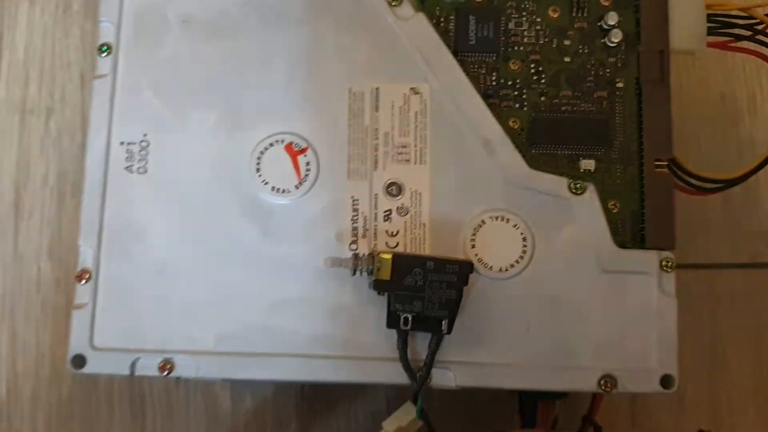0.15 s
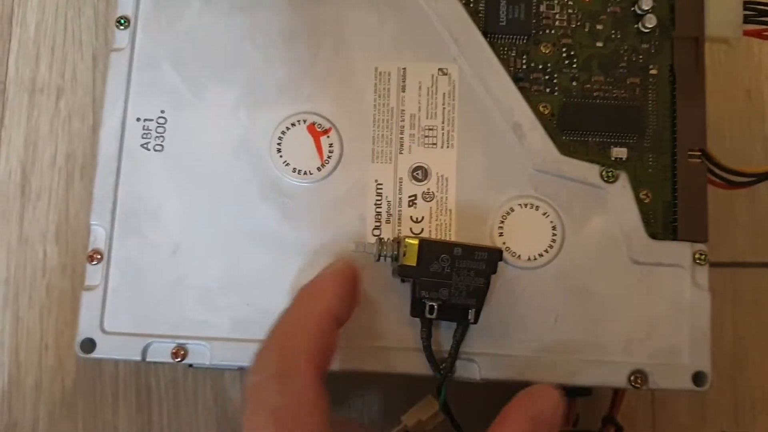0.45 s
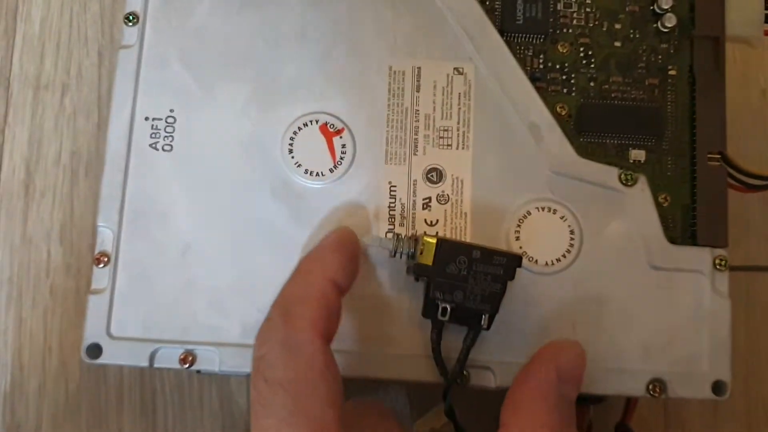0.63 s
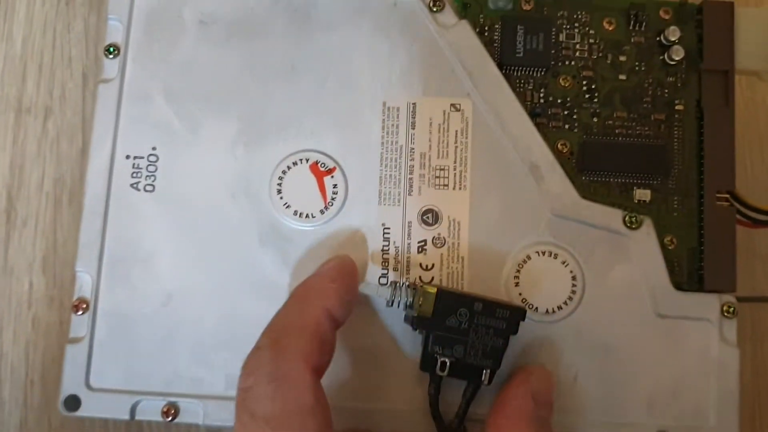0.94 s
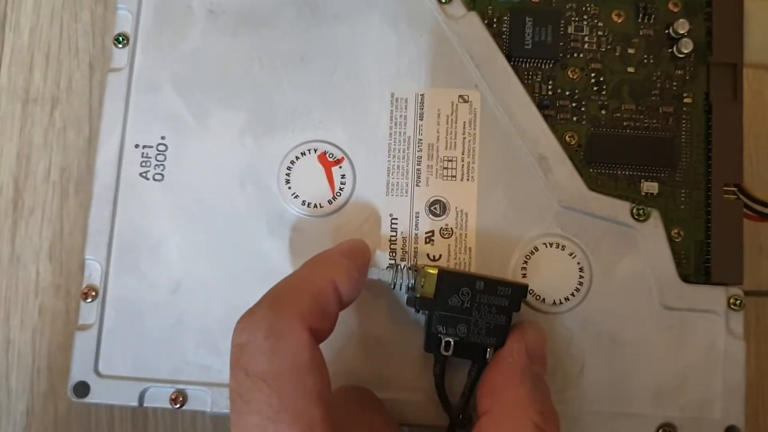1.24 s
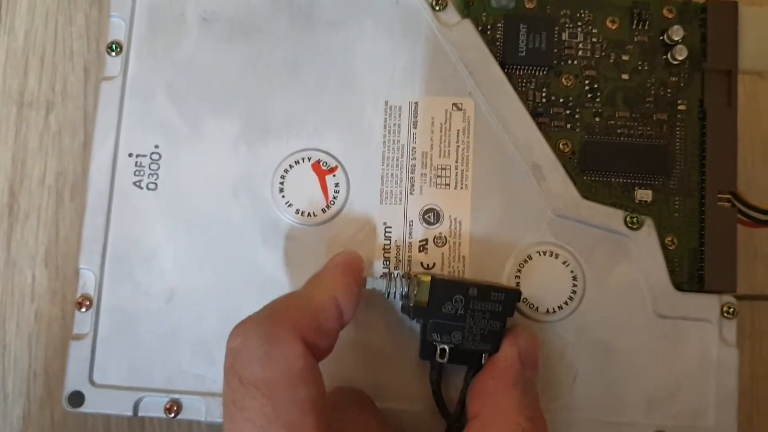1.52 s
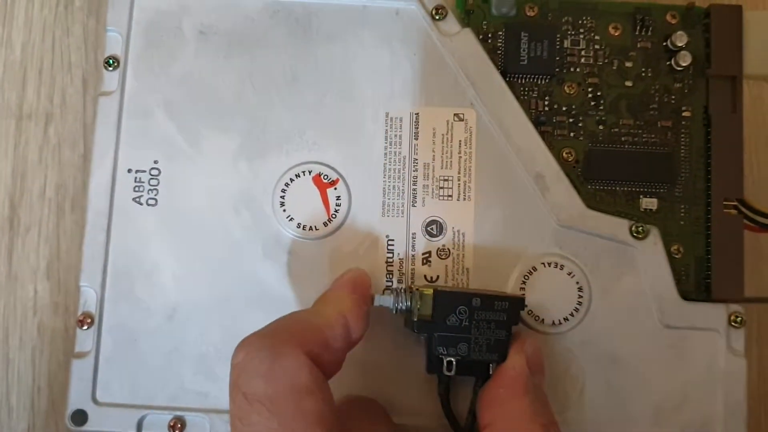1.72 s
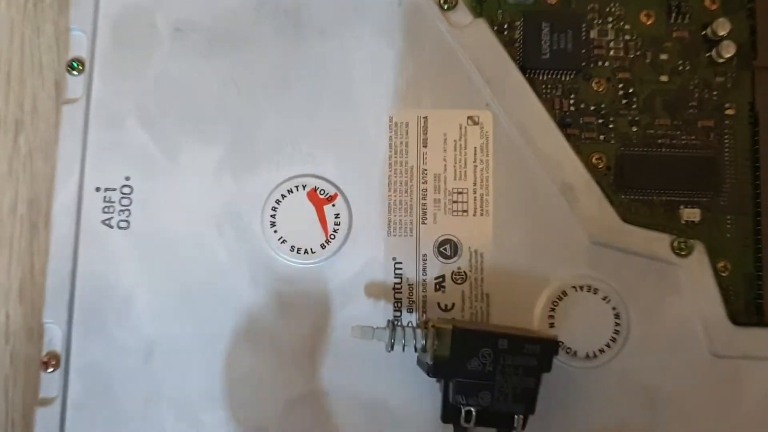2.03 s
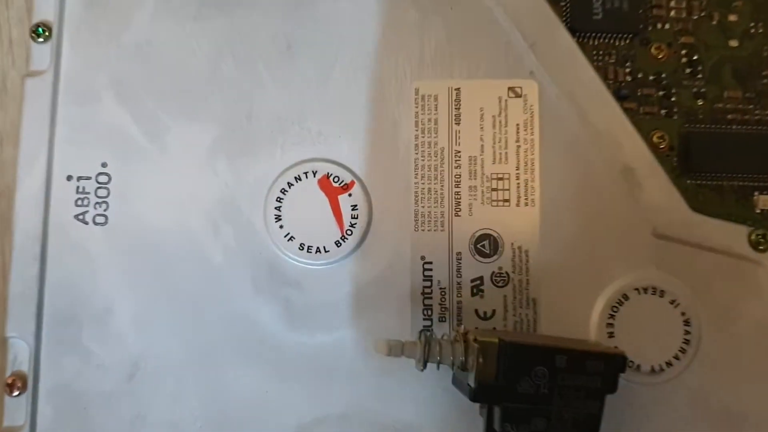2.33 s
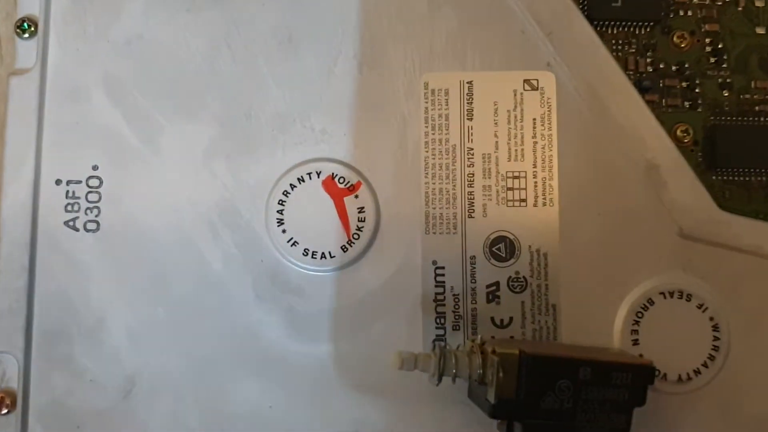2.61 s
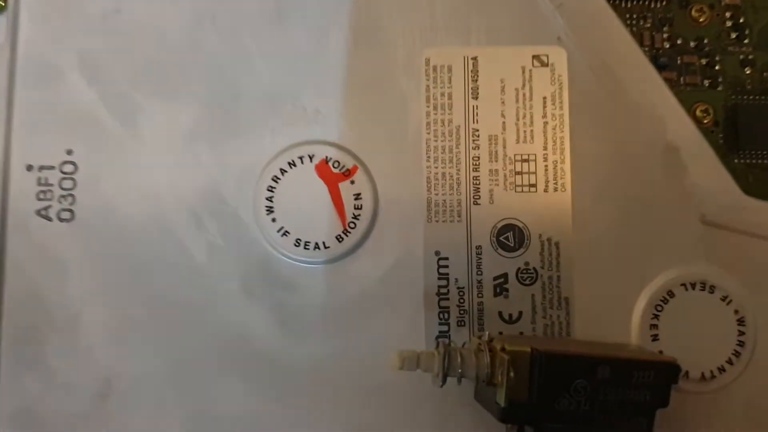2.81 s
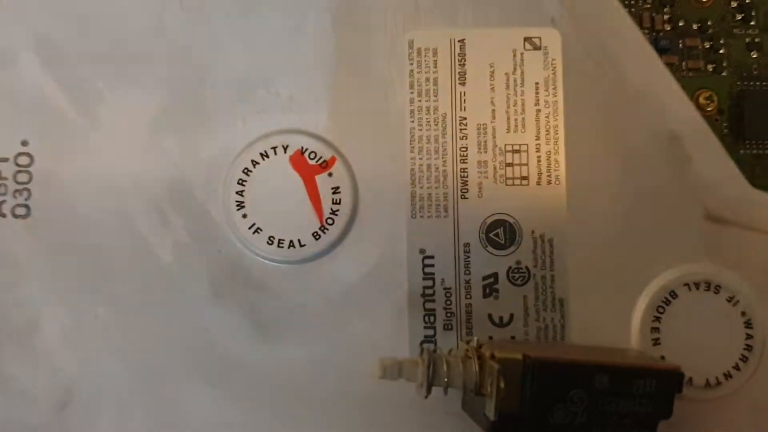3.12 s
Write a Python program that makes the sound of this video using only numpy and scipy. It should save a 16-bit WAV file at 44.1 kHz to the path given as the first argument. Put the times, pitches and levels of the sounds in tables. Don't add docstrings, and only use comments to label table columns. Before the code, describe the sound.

An old hard drive spins close to the microphone in a quiet room, a steady, buzzing, metallic whine with airy hiss and faint low hum. Faint handling taps come at 0.5 and 1.1 seconds, a light click near 1.6, then a loud sharp switch snap at 1.83 and a knock at 1.9. The whine sinks gradually, wavering in strength; around 2.3 a faint bright brushing and soft low thump join, still spinning at the end.

```python
import sys
import numpy as np
from scipy import signal
from scipy.fft import rfft, irfft
from scipy.io import wavfile

SR = 44100
rng = np.random.default_rng(int(sys.argv[2]) if len(sys.argv) > 2 else 0)


def invert_db(level):
    return 10 ** (np.asarray(level, dtype=float) / 20)


def inscribe(sig):
    pcm = np.round(np.clip(np.atleast_2d(sig).T, -1, 1) * 32767)
    wavfile.write(sys.argv[1], SR, pcm.astype(np.int16))


N = 143766

OFF_S, SLOWING_PER_S, EASING_PER_S2 = 1.855, .0765, .0025
UPPER_HZ, LOWER_HZ, CAGE_HZ, SPIN_HZ = 259.87, 260.25, 36.3, 65.0
UPPER_FIRST, LOWER_FIRST, SPIN_FIRST = 6, 11, 11
FAINT_DB, FAINT_SPREAD_DB, WANDER_DB, WANDER_HZ = -82, 4, 1.3, 1.2
LAG_S, LAG_FROM_HZ = .00031, 2000
AIR_DB, AIR_RESONANT = -48.5, .3
ROOM_DB, MAINS_HZ, MAINS_DB = -67, 120.2, -69.5
RUMBLE_S, RUMBLE_LONG_S, RUMBLE_DB = 1.89, 0.2, 7.5
TAIL_DB, TAIL_T60_S = -19, 0.18
BRUSH_S, BRUSH_LONG_S, BRUSH_DB, BRUSH_LOW_HZ = 2.31, 0.77, -57.5, 7500
THUMP_S, THUMP_HZ, THUMP_DB = 2.32, 69.4, -49.5

# tone/dB, cage band below/dB, above/dB, pan/dB
UPPER_BEARING = [(-62.0, -82.0, -79.0, 5.0), (-76.0, -68.0, -74.0, -3.0), (-73.0, -78.0, -80.0, -3.0),
                 (-77.0, -67.0, -71.0, 2.0), (-62.0, -73.0, -63.0, -2.0), (-76.0, -63.0, -59.0, -7.0),
                 (-70.0, -59.0, -63.0, -4.0), (-65.0, -76.0, -63.0, -6.0), (-87.0, -70.0, -79.0, -7.0),
                 (-61.0, -78.0, -70.0, -6.0), (-63.0, -77.0, -81.0, -4.0), (-66.0, -71.0, -77.0, -4.0),
                 (-71.0, -70.0, -76.0, -3.0), (-59.0, -64.0, -74.0, -10.0), (-58.0, -63.0, -61.0, -7.0),
                 (-59.0, -73.0, -76.0, -7.0), (-63.0, -72.0, -68.0, -3.0), (-56.0, -62.0, -65.0, -1.0),
                 (-66.0, -74.0, -74.0, -2.0), (-62.0, -69.0, -68.0, 1.0), (-67.0, -73.0, -70.0, 4.0),
                 (-57.0, -70.0, -72.0, -1.0), (-73.0, -77.0, -75.0, 1.0), (-65.0, -70.0, -77.0, -8.0)]
# tone/dB, cage band below/dB, above/dB, pan/dB
LOWER_BEARING = [(-56.0, -55.0, -46.0, -9.0), (-58.0, -65.0, -69.0, -3.0), (-72.0, -63.0, -86.0, -6.0),
                 (-73.0, -83.0, -68.0, -5.0), (-71.0, -70.0, -82.0, -5.0), (-62.0, -74.0, -73.0, -4.0),
                 (-66.0, -62.0, -68.0, -4.0), (-69.0, -73.0, -73.0, 0.0), (-63.0, -68.0, -62.0, -7.0),
                 (-58.0, -62.0, -67.0, -8.0), (-73.0, -77.0, -71.0, -7.0), (-65.0, -76.0, -66.0, -1.0),
                 (-63.0, -68.0, -74.0, 5.0), (-74.0, -75.0, -78.0, -1.0), (-74.0, -73.0, -76.0, 1.0),
                 (-73.0, -72.0, -79.0, 2.0), (-71.0, -78.0, -74.0, 1.0), (-70.0, -74.0, -72.0, 1.0)]
# cage minus spin below/dB, twice spin above/dB, pan/dB
BALL_SPIN = [(-63.0, -71.0, -3.0), (-63.0, -74.0, -2.0), (-68.0, -77.0, -5.0), (-79.0, -86.0, -4.0),
             (-68.0, -80.0, 0.0), (-76.0, -73.0, -3.0), (-63.0, -82.0, -12.0), (-72.0, -76.0, -4.0),
             (-68.0, -69.0, -4.0), (-62.0, -71.0, -7.0), (-77.0, -73.0, -7.0), (-76.0, -70.0, -2.0),
             (-70.0, -79.0, -1.0), (-78.0, -77.0, -5.0)]
# f/Hz, level/dB, pan/dB
ROTOR_TONES = [(288.15, -68.5, 3.5), (5560, -64.5, -13)]
# f/Hz, level/dB, pan/dB, change midway/dB, at end/dB
SWELLING_TONES = [(520, -76, 1, 11, 0), (577.6, -79, 1, 16, 8)]
# change midway/dB, at end/dB, left lead at speed/rad, coasting/rad
COAST_TONES = [(2, -6, -0.1, -0.1), (-3, 7, -3.1, -1.5), (4, -4, 0.7, 2.7), (1, 2, 1.1, 2.9),
               (-1, 2, 1.9, 1.4), (4, 5, 1.7, 2.3), (2, 7, -1.4, -0.6), (0, 13, -1.2, -1.8),
               (17, 17, 0.4, -0.9), (-11, -9, -1.3, -1.8), (7, 6, -1.8, -0.5), (4, 9, 2.1, 5.1),
               (9, 5, 1.0, 3.0), (4, -7, -2.8, -3.3), (4, 6, -2.9, -3.3), (5, -6, -0.6, -3.0),
               (0, 6, 2.7, 4.2), (0, 0, 0.1, 2.7), (-3, 7, 0.7, 1.8), (-3, 6, -0.0, 1.2), (6, 7, 1.1, 3.7),
               (-1, -10, 1.8, -1.1), (9, 15, -1.7, -0.9), (2, -5, 0.3, -0.5)]
# below midway/dB, at end/dB, above midway/dB, at end/dB
COAST_BANDS = [(0, -5, -1, -2), (14, 7, 3, -1), (-11, -5, -4, -5), (-6, -8, 1, -9), (1, -2, -3, -4),
               (-7, -8, -6, -5), (0, 2, -3, 9), (-3, 6, 7, 3), (10, 3, 4, 4), (-8, 1, -3, 0), (6, 6, 5, 6),
               (-3, 2, -1, 0), (6, -3, 0, 6), (1, 2, 0, -11), (-8, 1, 0, 0), (7, 3, 1, 3), (0, 9, -2, -4),
               (-10, -4, 3, -3), (2, -1, 9, 3), (-6, 2, 4, 2), (1, 1, 3, 0), (-4, -2, -1, 6), (4, 0, 7, 5),
               (0, -10, 9, 8)]
COAST_STAGES_S = [0, .55, 1.15]
# f/Hz, width/Hz, boost left/dB, boost right/dB
CASE = [(282.5, 24, 28, 32), (520, 60, 6, 8), (1553, 73, 21, 3), (1679, 40, 34.5, -3), (2480, 160, 18, -10),
        (2890, 110, 14, 1), (3505, 20, -21, -22), (4230, 130, -4, 12.5), (4825, 190, -8, 16),
        (5100, 450, -3, 13.5), (6080, 450, -9, 31), (7100, 1700, 26.5, 24.5), (7240, 95, 4, 12.5)]
# t/s, level/dB, whine near 2.9 kHz/dB
NEARNESS = [(0, -0.5, 1.5), (0.298, -0.6, 2.2), (.7, -0.8, 0.5), (1.0, 0, -4.5), (1.402, 0.4, -5.5),
            (1.8, 1.66, -6), (2.1, 0.4, -2), (2.5, 2.5, -19), (2.9, 2, -16), (3.26, 3, -2.5)]
# f/Hz, density/dB per Hz
AIR_SPECTRUM = [(740, -86), (1250, -36), (1530, -19.5), (2470, -12.5), (2930, -8.5), (3710, -10),
                (7270, -22.5), (10800, -28), (16000, -41.5)]
# f/Hz, density/dB per Hz
ROOM_SPECTRUM = [(25, -15), (55, -0.5), (120, -4), (250, -9), (520, -3), (680, -5.5), (820, -17.5),
                 (1400, -19)]
# f/Hz, likeness/0-1
LIKENESS = [(40, 0.15), (300, 0.77), (12000, 0.13)]
# f/Hz, pan/dB
LEAN = [(200, 2.5), (1000, 1.5), (3500, -2), (10000, -1)]
# t/s, peak/dB, dullness/0-1
SNAPS = [
    (1.5812, -20, .2),
    (1.8202, -34, .3),
    (1.8315, -7, .25),
    (1.8326, -9, .25),
    (1.8362, -24, .2),
    (1.9052, -25, .2),
]
# f/Hz, level/dB, T60/s
LATCH_MODES = [(2080, -9, 0.012), (3430, -36, 0.012), (4110, -9, 0.045), (5500, 0.5, .018),
               (6350, -5, 0.035), (8400, 10, 0.0067), (9970, 4, .014)]
# t/s, peak/dB, softness/0-1, drag/s
KNOCKS = [(.508, -52, .75, .03), (.535, -45, .75, .025), (1.098, -36, .5, .022), (1.15, -53, .85, .02),
          (1.226, -51, .85, .012), (1.545, -48, .65, .015), (1.641, -48, .8, .02), (1.8225, -29, .7, .005),
          (1.8315, -18, .4, 0), (1.904, -9, .5, 0), (1.9137, -20, .6, .001), (1.985, -46, .9, .02)]
# f/Hz, level/dB, T60/s
LID_MODES = [(505, -11, .1), (625, -10, .07), (1012, -21, .06), (1118, -21, .05), (1480, -5, .022),
             (1653, -4, .022), (2024, -4, .014), (2165, -1, .016), (4100, -8, .012)]


def near(t):
    s, *columns = np.transpose(NEARNESS)
    return [np.interp(t, s, column) for column in columns]


def case_db(hz):
    return sum(np.multiply.outer([left, right], 1 / (1 + (2 * (hz - f) / width) ** 2))
               for f, width, left, right in CASE)


def port_lag_s(hz):
    return LAG_S * (hz > LAG_FROM_HZ)


def comb(rows, first, base_hz):
    tones = []
    for k, row in enumerate(rows, first):
        tone, bands = COAST_TONES[k - 6], COAST_BANDS[k - 6]
        offsets_hz = (0, -CAGE_HZ, CAGE_HZ)
        changes = (tone[:2], bands[:2], bands[2:])
        for offset_hz, db, change in zip(offsets_hz, row, changes):
            tones.append((k * base_hz + offset_hz, db, row[-1], change, tone[2:]))
    return tones


def faint_tones():
    tones = []
    chance = rng.standard_normal((26, 3, 2))
    for k in range(26):
        for j, offset_hz in enumerate((2 * CAGE_HZ, -2 * CAGE_HZ, SPIN_HZ + CAGE_HZ)):
            db = FAINT_DB + FAINT_SPREAD_DB * chance[k, j, 0]
            tones.append(((6 + k) * UPPER_HZ + offset_hz, db, -3 + 3 * chance[k, j, 1], None, None))
    for k in range(30, 38):
        tones.append((k * UPPER_HZ, FAINT_DB + 2 * rng.standard_normal(), -2, None, None))
    return tones


def rotor_tones():
    tones = [(*tone, None, None) for tone in ROTOR_TONES]
    tones += [(*tone[:3], tone[3:], (0, 0)) for tone in SWELLING_TONES]
    tones += comb(UPPER_BEARING, UPPER_FIRST, UPPER_HZ)
    tones += comb(LOWER_BEARING, LOWER_FIRST, LOWER_HZ)
    for k, row in enumerate(BALL_SPIN, SPIN_FIRST):
        for offset_hz, db in zip((CAGE_HZ - SPIN_HZ, 2 * SPIN_HZ), row):
            tones.append((k * UPPER_HZ + offset_hz, db, row[-1], None, None))
    return tones + faint_tones()


def bearings():
    coast_s = np.clip(np.arange(N) / SR - OFF_S, 0, None)
    speed = 1 - SLOWING_PER_S * coast_s + EASING_PER_S2 * coast_s ** 2
    turns = np.cumsum(speed) / SR
    hop = 64
    at = np.arange(0, N, hop)
    level_db, whine_db = near(at / SR)
    moved = np.clip(coast_s / COAST_STAGES_S[1], 0, 1).astype(np.float32)
    pole = np.exp(-2 * hop * np.pi * WANDER_HZ / SR)
    out = np.zeros((2, N))
    for hz, db, pan_db, change, leads in rotor_tones():
        if db <= FAINT_DB:
            continue
        drift = rng.standard_normal((2, len(at) + 500))
        wander = signal.lfilter([1], [1, -2 * pole, pole * pole], drift)[:, 500:]
        wander -= wander[:, speed[at] == 1].mean(1, keepdims=True)
        shade_db = level_db + whine_db * (2750 < hz < 3000)
        if change is None:
            slide_db = case_db(hz * speed[at]) - case_db(hz)[:, None]
            lead = -2 * np.pi * (hz * port_lag_s(hz) + rng.normal(0, .07))
        else:
            slide_db = np.interp(coast_s[at], COAST_STAGES_S, [0, *change])
            shade_db = shade_db * (1 - moved[at])
            lead = leads[0] + (leads[1] - leads[0]) * moved
        gain_db = db + shade_db + slide_db + WANDER_DB * wander / wander.std()
        gain = np.sqrt(2) * invert_db(gain_db + np.outer([.5, -.5], [pan_db])).astype(np.float32)
        gain = np.repeat(gain, hop, axis=1)[:, :N]
        angle = 2 * np.pi * ((hz * turns + rng.random()) % 1).astype(np.float32)
        out[0] += gain[0] * np.sin(angle)
        out[1] += gain[1] * np.sin(angle - np.float32(lead))
    return out


def at_hz(points, hz):
    f, value = np.transpose(points)
    return np.interp(np.log(hz), np.log(f), value)


def noise(spectrum, resonant):
    hz = np.maximum(np.arange(N // 2 + 1) * SR / N, 1)
    mid, side = rfft(rng.standard_normal((2, N)))
    alike = np.clip(at_hz(LIKENESS, hz), 0, 1)
    sign = np.array([[1], [-1]])
    both = np.sqrt(1 + alike) * mid + sign * np.sqrt(1 - alike) * side
    both = both * np.exp(-1j * np.pi * hz * port_lag_s(hz) * sign)
    colour_db = at_hz(spectrum, hz) + sign * at_hz(LEAN, hz) / 2 + resonant * case_db(hz)
    x = irfft(both * invert_db(colour_db), N)
    return x / x.std()


def platter_air(t):
    level_db, _ = near(t)
    return invert_db(AIR_DB + level_db) * noise([(900, -59.0)] + AIR_SPECTRUM, AIR_RESONANT)


def room(t):
    rumble_db = RUMBLE_DB * np.exp(-((t - RUMBLE_S) / RUMBLE_LONG_S) ** 2)
    return invert_db(ROOM_DB + rumble_db) * noise(ROOM_SPECTRUM + [(2000, -63)], resonant=0)


def mains_hum(t):
    return invert_db(MAINS_DB + 3.5) * np.sin(2 * np.pi * MAINS_HZ * t)


def strikes(hits, modes, crack_db, low_hz):
    out = np.zeros(N)
    t = np.arange(SR // 4) / SR
    high_pass = signal.butter(3, low_hz, "high", fs=SR, output="sos")
    chances = rng.standard_normal((len(hits), len(modes), 2))
    for (s, db, soft, *drag_s), chance in zip(hits, chances):
        ring = invert_db(crack_db - 60 * t / 0.012) * rng.standard_normal(len(t))
        for (hz, level_db, t60_s), (a, b) in zip(modes, chance):
            tone = np.sin(2 * np.pi * hz * (1 + .01 * b) * t)
            ring += invert_db(level_db + 2 * a) * tone * invert_db(-60 * t / t60_s)
        grains = rng.standard_normal(len(t)) ** 3 * (t <= sum(drag_s))
        ring = signal.fftconvolve(ring, grains)[:len(t)]
        soft = np.clip(soft, 0, .95)
        ring = signal.lfilter([1], [1, -2 * soft, soft * soft], ring)
        ring = signal.sosfilt(high_pass, ring)
        i = int(s * SR)
        out[i:i + len(t)] += invert_db(db) * ring / np.abs(ring).max()
    return out


def switch():
    t = np.arange(SR // 3) / SR
    snaps = strikes(SNAPS, LATCH_MODES, crack_db=9.5, low_hz=1610) * invert_db([[3.5], [-1.5]])
    snaps[0] = np.roll(snaps[0], int(LAG_S * SR))
    knocks = strikes(KNOCKS, LID_MODES, crack_db=-15.0, low_hz=800) * invert_db([[1.5], [-.8]])
    direct = snaps + knocks
    tail = rng.standard_normal((2, len(t))) * invert_db(TAIL_DB - 60 * t / TAIL_T60_S) * (t > .003)
    return direct + signal.fftconvolve(direct, tail, axes=1)[:, :N] / 10


def head_landing(t):
    u = t - BRUSH_S
    high_pass = signal.butter(4, BRUSH_LOW_HZ, "high", fs=SR, output="sos")
    hiss = signal.sosfilt(high_pass, noise(LEAN, resonant=0))
    shape = np.clip(u / 0.0045, 0, 1) * np.clip((BRUSH_LONG_S - u) / 0.33, 0, 1)
    shape = shape * (1 + 2.3 * np.exp(-np.abs(u) / 0.022))
    v = np.clip(t - THUMP_S, 0, None)
    thump = np.sin(2 * np.pi * THUMP_HZ * v) * v / 0.032 * np.exp(-v / 0.023)
    return invert_db(BRUSH_DB) * shape * hiss + invert_db(THUMP_DB) * thump


def scene():
    t = np.arange(N) / SR
    drive = bearings() + platter_air(t)
    background = room(t) + mains_hum(t)
    return drive + background + switch() + head_landing(t)


def top_cut(x):
    return signal.sosfilt(signal.butter(12, 16460, fs=SR, output="sos"), x)


def record(dry):
    low_pass = signal.cheby2(12, 60, 16800, fs=SR, output="sos")
    return top_cut(signal.sosfilt(low_pass, dry))


dry = scene()
out = record(dry)
inscribe(out)
```